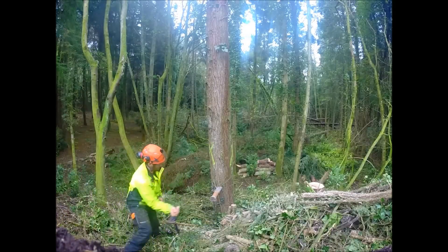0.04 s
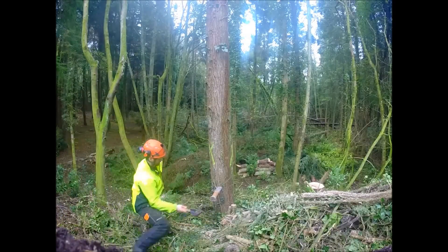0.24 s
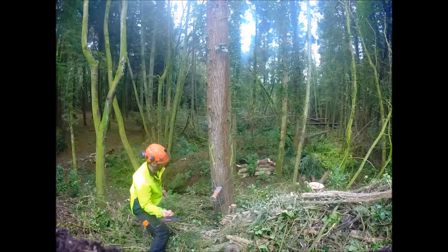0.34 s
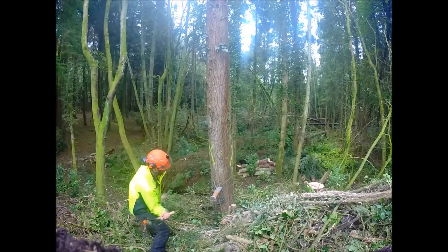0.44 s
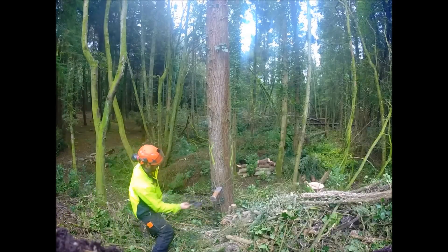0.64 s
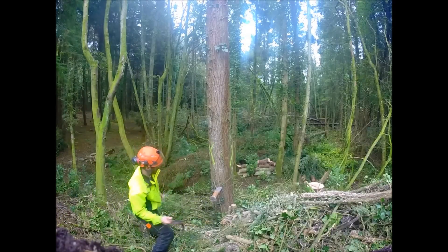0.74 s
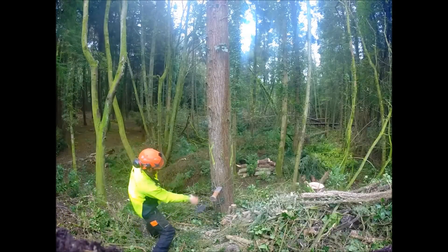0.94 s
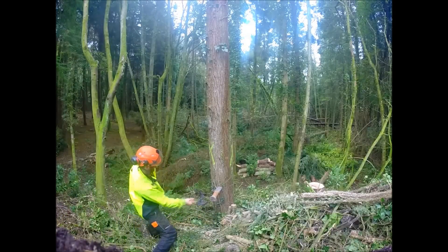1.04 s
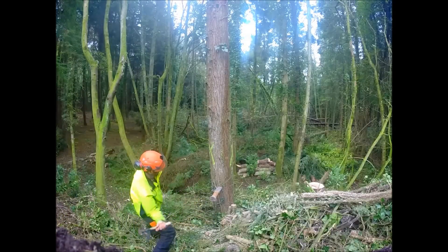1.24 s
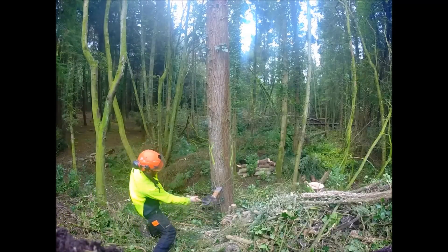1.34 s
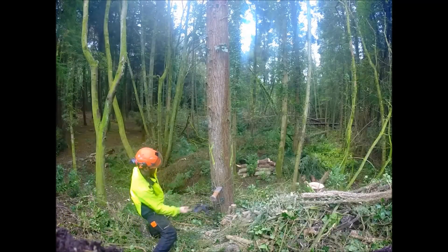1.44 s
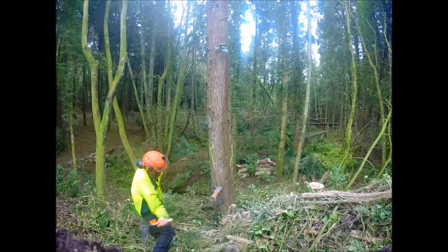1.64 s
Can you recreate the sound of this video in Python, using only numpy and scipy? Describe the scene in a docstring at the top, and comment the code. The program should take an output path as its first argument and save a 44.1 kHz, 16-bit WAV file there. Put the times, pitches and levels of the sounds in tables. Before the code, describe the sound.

Hammer strikes a felling wedge four times at an even pace, each a hard metallic clank with a woody knock and short forest echo; faint rustles and small knocks between, heard from a modest distance outdoors.

```python
"""A rustle and a few small knocks in a quiet wood, then four even hammer blows on a felling wedge in a large tree.
Each blow layers a noise crack, a short clang of steel modes and a knock shaped from a spectrum.
The knock runs along the trunk and returns three times, bass last; trunk and steel ring on, bark shivers.
Noise tails scatter the sound among ground, brush and trees; rustles, small knocks and a twig snap fill the gaps.
"""
import sys
import numpy as np
from scipy import signal
from scipy.fft import rfft, irfft
from scipy.io import wavfile
from scipy.ndimage import uniform_filter1d

SR = 44100
rng = np.random.default_rng(int(sys.argv[2]) if len(sys.argv) > 2 else 0)


def dump(signal):
    """Clip the signal to [-1, 1] and save it as 16-bit WAV at the path in sys.argv[1]."""
    limited = np.clip(np.atleast_2d(signal).T, -1, 1)
    pcm = np.round(limited * 32767).astype(np.int16)
    wavfile.write(sys.argv[1], SR, pcm)


N = 74970  # length in samples


def amp(db):
    """Decibels to gain."""
    return 10 ** (np.asarray(db) / 20)


def read(points, hz, axis=1):
    """One column of a table, joined on a log-frequency axis."""
    table = np.transpose(points)
    return np.interp(np.log(hz + 1), np.log(table[0] + 1), table[axis])


def unit(x):
    """Scales to rms 1."""
    return x / np.sqrt(np.mean(x ** 2) + 1e-20)


def colour(x, points):
    """Filters by a table of gains over frequency."""
    gain = amp(read(points, np.fft.rfftfreq(len(x), 1 / SR)))
    return irfft(rfft(x) * gain, len(x))


def noise(points):
    """White noise filtered by a table of gains."""
    return colour(rng.standard_normal(N), points)


def time_from(start):
    """Time axis in seconds, zero at the event."""
    return np.arange(N) / SR - start


def strike(t, rise, t60):
    """Envelope that swells up to t = 0, then dies away by 60 dB per t60."""
    swell = np.clip(1 + t / rise, 0, 1) ** 2
    return swell * amp(-60 * np.maximum(t, 0) / t60)


# still forest, spectral shape before its overall level is set [f/Hz, level/dB]
FOREST_AIR = [(15, -3), (35, 4), (75, -2), (150, -1.5), (317, -3.5), (600, -5), (1070, -7), (1520, -7.5),
              (1820, -1), (2160, -9.5), (2550, -11), (2910, -17.5), (4140, -19.5), (12500, -31.5),
              (16000, -38)]
AIR_DB, AIR_PATCH_DB = -53.5, 1  # overall rms, rms depth of the patches


def forest_air():
    """Quiet background: coloured noise whose level drifts gently in patches of time and frequency."""
    hz, _, z = signal.stft(rng.standard_normal(N), SR, nperseg=1024, noverlap=768)
    patches = uniform_filter1d(rng.standard_normal(z.shape), size=12, axis=0)
    patches = unit(uniform_filter1d(patches, size=14, axis=1))
    z = z * amp(read(FOREST_AIR, hz)[:, None] + AIR_PATCH_DB * patches)
    air = signal.istft(z, SR, nperseg=1024, noverlap=768)[1][:N]
    return amp(AIR_DB) * unit(air)


# scatter from nearby ground and brush, before the build-up [f/Hz, level/dB, T60/s]
NEAR_SCATTER = [(100, -23, .2), (400, -21, .14), (900, -14.5, .12), (1400, -13, .12), (1900, -12.5, .13),
                (3500, -13, .13), (6000, -20, .14), (15000, -24, .12)]
# scatter from the far trees, before the build-up [f/Hz, level/dB, T60/s]
FAR_SCATTER = [(100, -33, 0.33), (507, -12.5, 0.29), (1040, -16.5, 0.27), (2000, -23.5, 0.81),
               (3970, -14, 0.83), (5350, -28, 0.41), (8000, -20.5, .35), (15000, -30, 0.22)]


def scatter(x, bands, build_s):
    """A diffuse one-second noise tail that builds up, each band dying at its own speed."""
    hz, t, z = signal.stft(rng.standard_normal(SR), SR, nperseg=256)
    t60 = read(bands, hz, axis=2)[:, None]
    decay = amp(read(bands, hz)[:, None] - 60 * t / t60)
    same_energy = np.sqrt(2 * np.log(1000) / (t60 * SR))  # a longer decay starts lower
    tail = signal.istft(z * decay * same_energy, SR, nperseg=256)[1][:SR]
    tail = tail * np.minimum(np.arange(SR) / SR / build_s, 1)
    return signal.fftconvolve(x, tail)[:N]


# rustles of clothing and brush as the hammer swings, level and tilt on top of the common colour
# [t/s (middle), level/dB, width/s (standard deviation), treble tilt/dB per octave]
RUSTLES = [(0.021, -4.5, 0.042, -3), (.115, -4.5, 0.074, -6.5), (0.361, 1.5, 0.032, -4.5),
           (0.424, -1, 0.034, 7.5), (.56, -4, .05, -7), (.97, -5, 0.044, -8), (1.38, -9, 0.038, -7)]
# their common colour, before each rustle's level and tilt [f/Hz, level/dB]
RUSTLE_COLOUR = [(200, -43.5), (2000, -50.5), (5500, -57.5), (8500, -54), (11000, -61), (13400, -56),
                 (16000, -74)]
RUSTLE_PIVOT_HZ, RUSTLE_GRAIN_DB, RUSTLE_GRAIN_S = 7900, 2.5, 0.0016


def rustle(middle, db, width, tilt_db):
    """A soft swell of hiss, made grainy by fast random level changes."""
    # the tilt stops one octave below the pivot
    tilted = [(hz, level + tilt_db * max(np.log2(hz / RUSTLE_PIVOT_HZ), -1)) for hz, level in RUSTLE_COLOUR]
    flutter = uniform_filter1d(rng.standard_normal(N), max(int(RUSTLE_GRAIN_S * SR), 1))
    grain = amp(RUSTLE_GRAIN_DB * unit(flutter))
    swell = np.exp(-(time_from(middle) / width) ** 2 / 2)
    return amp(db) * noise(tilted) * grain * swell


# colour of the twig snap [f/Hz, level/dB]
TWIG_COLOUR = [(60, -44), (250, -22.5), (1500, -24.5), (3000, -26), (5300, -35), (6200, -20), (7000, -31),
               (8800, -21.5), (10800, -41), (13400, -24), (16000, -50)]
SNAP_S, SNAP_T60_S, SNAP_RISE_S = .3832, 0.015, 0.0022


def twig_snap():
    """A bright, short snap: coloured noise under a fast decay."""
    return noise(TWIG_COLOUR) * strike(time_from(SNAP_S), SNAP_RISE_S, SNAP_T60_S)


# small knocks of tool and footing [t/s, level/dB, f/Hz, T60/s, noisy share/0-1]
SMALL_KNOCKS = [(.0065, -40, 1860, 0.016, 0.6), (.0375, -32, 1270, 0.021, .01),
                (.0472, -27, 1248, .04, .01), (.1474, -32, 750, .014, 0.64), (0.156, -36.5, 1340, .025, .7),
                (0.942, -33, 1670, 0.019, 0.81), (.9795, -34, 790, 0.028, 0.4),
                (1.318, -34, 1750, 0.014, 0.67), (1.3386, -28.5, 1570, 0.0096, 0.41),
                (1.359, -36.5, 810, .014, 0.5)]
KNOCK_RISE_S, KNOCK_WIDTH_OCT = 0.0011, 0.46


def small_knock(start, db, pitch_hz, t60, noisy):
    """A light knock: one short mode mixed with a scuff of noise around its pitch."""
    t, hz = time_from(start), np.fft.rfftfreq(N, 1 / SR)
    band = 1 / (1 + (np.log2((hz + 1) / pitch_hz) / KNOCK_WIDTH_OCT) ** 4)
    scuff = unit(irfft(rfft(rng.standard_normal(N)) * band, N))
    mode = np.sin(2 * np.pi * pitch_hz * t)
    share = np.clip(noisy, 0, 1)
    return amp(db) * strike(t, KNOCK_RISE_S, t60) * (share * scuff + (1 - share) * mode)


CONTACT_S = 0.00084  # from first touch to full force


def ring(t, modes):
    """Decaying modes, all pushed inward by the blow."""
    total = 0
    for hz, db, t60 in modes:
        total = total - amp(db) * strike(t, CONTACT_S, t60) * np.cos(2 * np.pi * hz * t)
    return total


# loose bark and needles, before the blow's crack level is added [f/Hz, level/dB]
SHIVER_COLOUR = [(1500, -73), (4000, -57), (7000, -47.5), (10000, -56), (14000, -58.5), (16000, -66)]
SHIVER_PEAK_S, SHIVER_T60_S = 0.031, 0.28


def bark_shiver(t, crack_db):
    """Bark and needles shiver after a blow: hiss that swells, then fades."""
    return amp(crack_db) * noise(SHIVER_COLOUR) * strike(t - SHIVER_PEAK_S, SHIVER_PEAK_S, SHIVER_T60_S)


# lingering tones of the steel, before the blow's level and length factor [f/Hz, level/dB, T60/s]
STEEL_TONES = [(1707, -46, 2.5), (1830, -46, .8), (1866, -56, .5), (1952, -60, .8), (2126, -62, .6)]


def steel_singing(t, sing_db, sing_length):
    """The steel sings on faintly in a few slowly dying tones."""
    return ring(t, [(hz, db + sing_db, t60 * sing_length) for hz, db, t60 in STEEL_TONES])


# low modes of the trunk, before the blow's knock level is added [f/Hz, level/dB, T60/s]
TRUNK_MODES = [(76.7, -62, 0.88), (118, -45, 0.32), (166.8, -43, 0.34), (228, -42.5, 0.26),
               (297.4, -46, 0.31)]


def trunk_ring(t, knock_db):
    """The trunk resonates in low modes, as loud as the knock drives it."""
    return amp(knock_db) * ring(t, TRUNK_MODES)


# returns of the knock through the trunk [delay/s, polarity/+1 or -1]
TRUNK_TRIPS = [(.0102, 1), (.0217, -1), (.0333, 1)]
# level of each return, on top of the colour below [level/dB]
TRIP_LEVELS = [0, -10, -21]
# what every return keeps of the knock, before its own level [f/Hz, level/dB]
TRIP_COLOUR = [(50, -9), (160, -5), (300, 3.5), (420, 0.5), (620, 2.5), (850, 0.5), (1200, -2), (1550, -21),
               (2200, -9), (5000, -55)]
BASS_LAG_CYCLES, BASS_LAG_HZ, BASS_LAG_POWER = 2.7, 135, 1.5


def trunk_returns(knock):
    """The knock comes back duller, its bass later on every trip."""
    hz = np.fft.rfftfreq(N, 1 / SR)
    # phase in cycles that falls with frequency, which delays the bass
    lag = BASS_LAG_CYCLES * np.exp(-(hz / BASS_LAG_HZ) ** BASS_LAG_POWER)
    trips = 0
    for trip, ((delay, sign), db) in enumerate(zip(TRUNK_TRIPS, TRIP_LEVELS), start=1):
        trips = trips + sign * amp(db) * np.exp(2j * np.pi * (trip * lag - hz * delay))
    return irfft(rfft(colour(knock, TRIP_COLOUR)) * trips, N)


# knock of the wedge in the wood, before the blow's knock level is added [f/Hz, level/dB]
KNOCK_SPECTRUM = [(30, -22), (80, -6), (150, 11.5), (300, 11), (400, 5.5), (520, 18.5), (800, 23.5),
                  (1000, 18), (1450, 22.5), (1900, 16.5), (2300, 6), (3000, -19), (5000, 3), (16000, -25)]


def wedge_knock(start, knock_db):
    """The wedge thumps into the wood: an inward pulse with a set spectrum, faded in before the blow."""
    hz = np.fft.rfftfreq(N, 1 / SR)
    spectrum = amp(knock_db + read(KNOCK_SPECTRUM, hz)) * np.exp(-2j * np.pi * hz * start)
    return -irfft(spectrum, N) * np.clip(2 + time_from(start) / CONTACT_S, 0, 1)


# upper modes of the wedge, before the blow's level and tilt are added [f/Hz, level/dB, T60/s]
WEDGE_MODES = [(2768, -25.5, 0.014), (3113, -26.5, 0.015), (3725, -28.5, 0.023), (4270, -29, 0.021),
               (4780, -30, 0.018), (4900, -28, 0.014), (7440, -38, 0.014), (9200, -39, 0.018)]
SECOND_T60_S, TILT_PIVOT_HZ = 0.012, 3630


def wedge_clang(t, main_mode, second_hz, second_db, upper_db, tilt_db):
    """The wedge clangs: a main mode, a second one and a set of upper modes, all short."""
    upper = [(hz, db + upper_db + tilt_db * np.log2(hz / TILT_PIVOT_HZ), t60) for hz, db, t60 in WEDGE_MODES]
    return ring(t, [main_mode, (second_hz, second_db, SECOND_T60_S)] + upper)


# steel on steel, before the blow's crack level is added [f/Hz, level/dB]
CRACK_COLOUR = [(500, -37), (1800, -0.5), (2600, 2), (4500, -15.5), (5600, -27.5), (8500, -15.5),
                (10500, -26.5), (14000, -21), (16500, -64)]
CRACK_T60_S, CRACK_LEAD_S = 0.0078, 0.00089


def steel_crack(t, crack_db):
    """Hammer meets wedge: a very short noise burst that peaks just ahead of the clang."""
    return amp(crack_db) * noise(CRACK_COLOUR) * strike(t + CRACK_LEAD_S, CONTACT_S / 2, CRACK_T60_S)


# hammer blows; knock, upper, crack and singing levels add to the tables above
# [t/s, knock level/dB, clang f/Hz, clang level/dB, clang T60/s, second mode f/Hz, second mode level/dB,
#  upper modes level/dB, their tilt/dB per octave, crack level/dB, singing level/dB, singing length/factor]
BLOWS = [(.2057, 0.5, 1837, -3, 0.022, 2470, -28, -1.5, 1, -6, -2.5, 1.78),
         (.6117, 0, 1900, -8, 0.015, 2560, -18, -0.5, 1.5, -0.5, -24, 0.27),
         (1.0301, 0, 1904, -4, .015, 2610, -15, -7.5, -9, -3, -16, .8),
         (1.4147, 0, 1960, -9.5, .012, 2150, -17.5, 3.5, -2, 0, -12, 0.85)]


def blow(start, knock_db, clang_hz, clang_db, clang_t60, second_hz, second_db,
         upper_db, tilt_db, crack_db, sing_db, sing_length):
    """One blow: gives the hit itself and what rings on in trunk, bark and steel."""
    t = time_from(start)
    knock = wedge_knock(start, knock_db)
    clang = wedge_clang(t, (clang_hz, clang_db, clang_t60), second_hz, second_db, upper_db, tilt_db)
    hit = knock + clang + steel_crack(t, crack_db)
    after = trunk_returns(knock) + trunk_ring(t, knock_db)
    after = after + steel_singing(t, sing_db, sing_length) + bark_shiver(t, crack_db)
    return np.array([hit, after])


def scene():
    """Blows and small sounds among the trees."""
    rustles = sum(rustle(*row) for row in RUSTLES)
    small_knocks = sum(small_knock(*row) for row in SMALL_KNOCKS)
    hits, after = sum(blow(*row) for row in BLOWS)
    direct = hits + small_knocks + twig_snap()
    wood = scatter(direct, NEAR_SCATTER, build_s=0.002) + scatter(direct, FAR_SCATTER, build_s=0.014)
    return (direct + after + wood + rustles + forest_air())[None]


CEILING, LOW_CUT_HZ, EDGE_HZ = .97, 62, 16200  # full scale is 1


def record(dry):
    """Clips whatever passes the ceiling, then cuts the lows and limits the band."""
    clipped = np.clip(dry, -CEILING, CEILING)
    low_cut = signal.lfilter(*signal.butter(2, LOW_CUT_HZ, "high", fs=SR), clipped)
    band_limit = signal.firwin(255, EDGE_HZ, window=("kaiser", 9), fs=SR)
    return signal.oaconvolve(low_cut, band_limit[None], "same")


dry = scene()
out = record(dry)
dump(out)
```